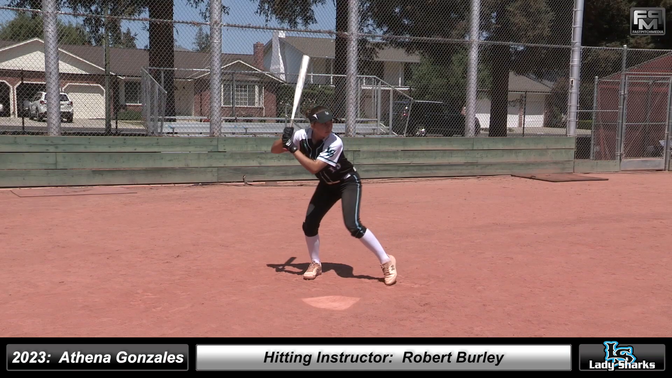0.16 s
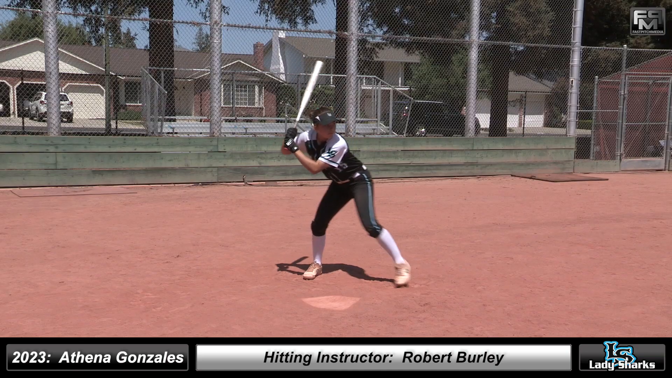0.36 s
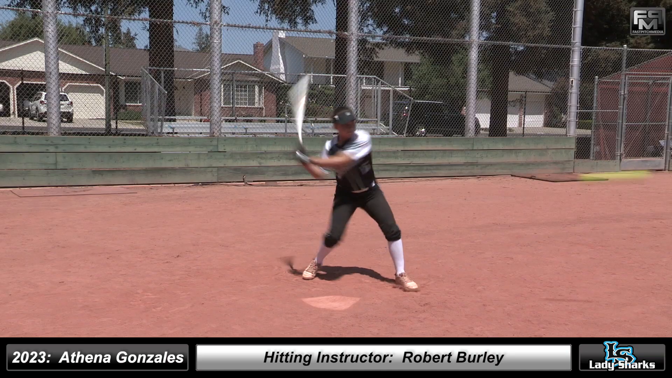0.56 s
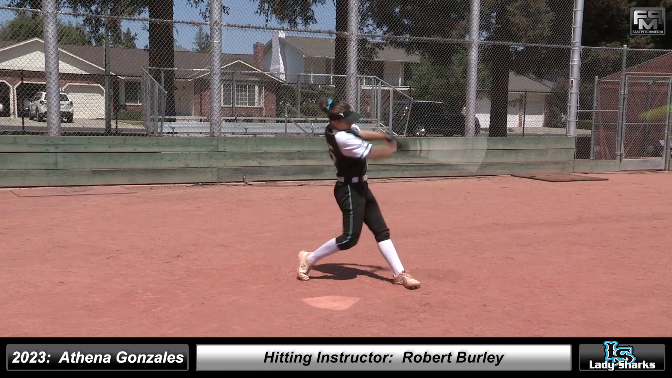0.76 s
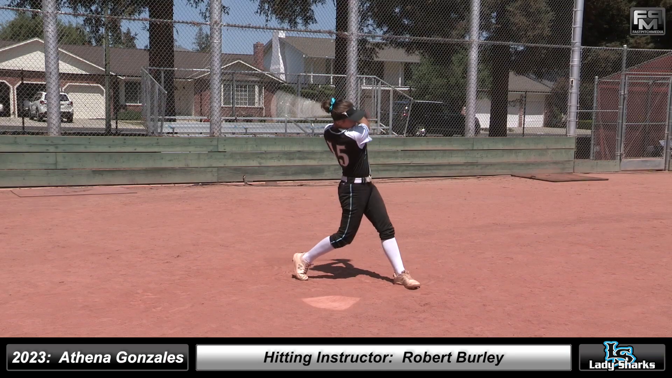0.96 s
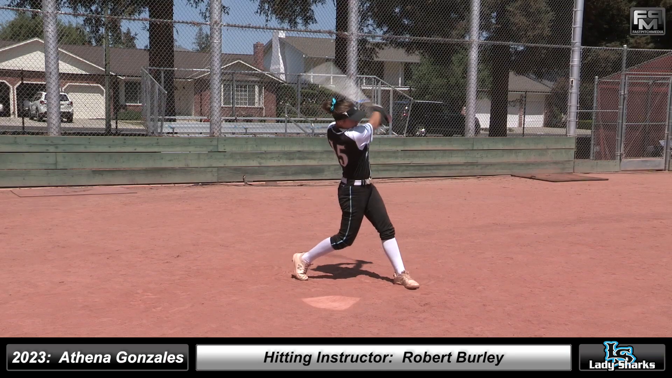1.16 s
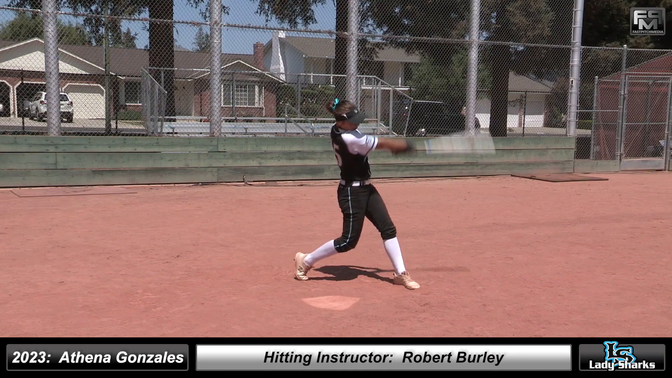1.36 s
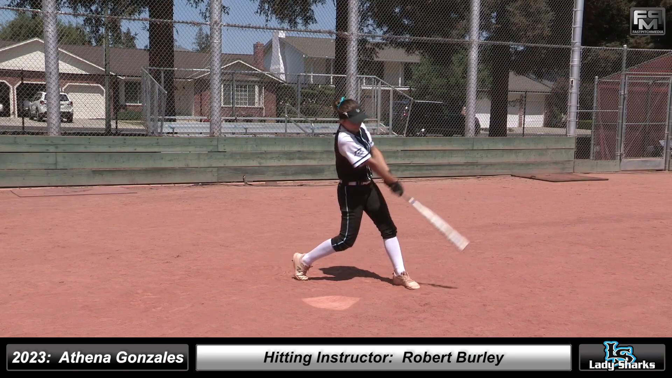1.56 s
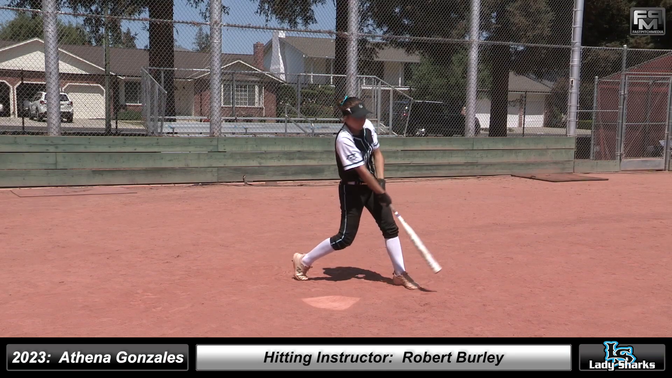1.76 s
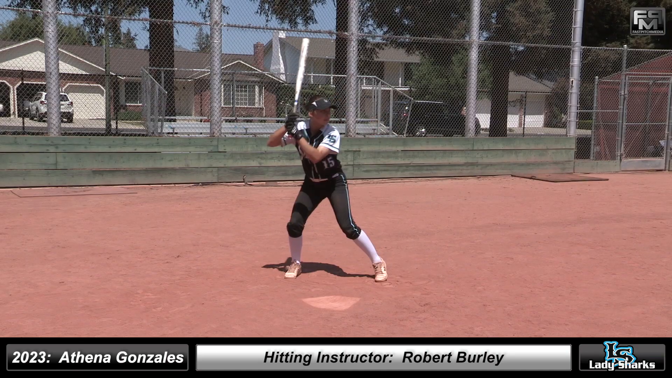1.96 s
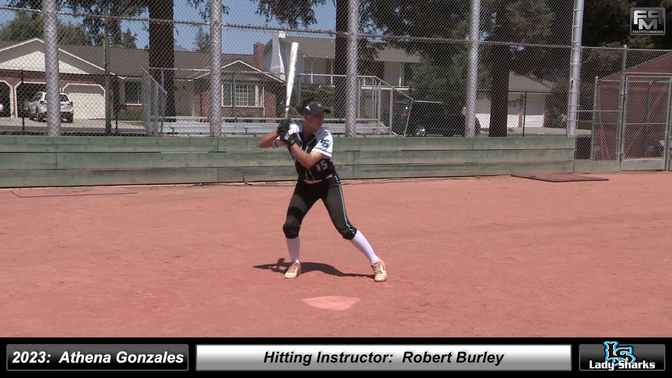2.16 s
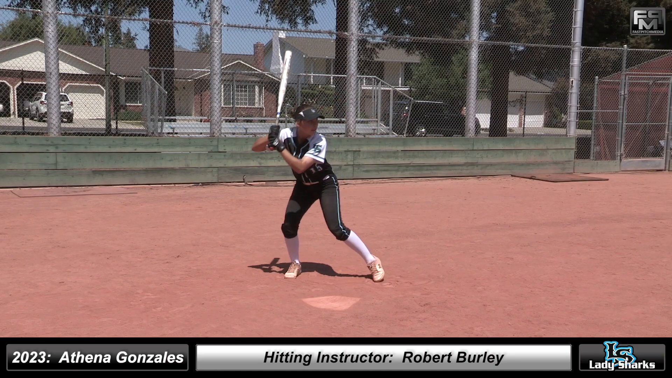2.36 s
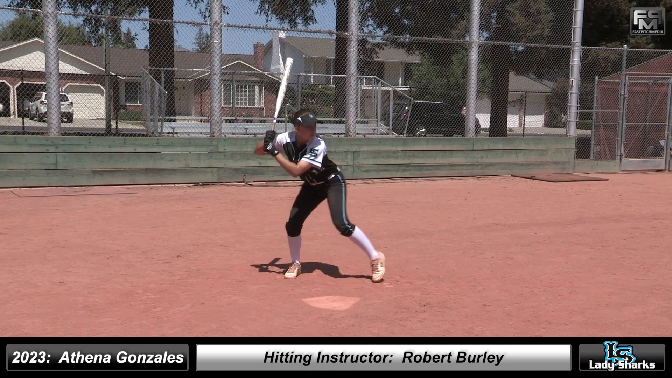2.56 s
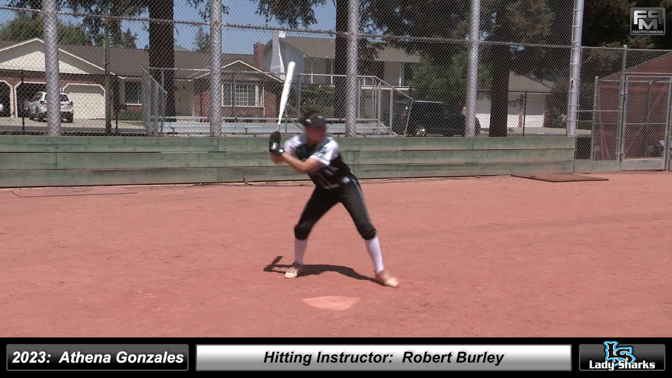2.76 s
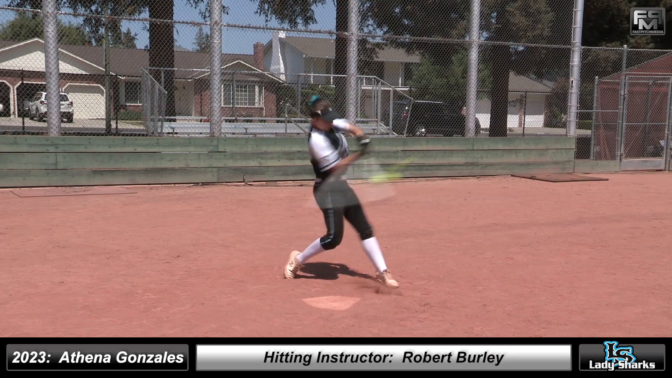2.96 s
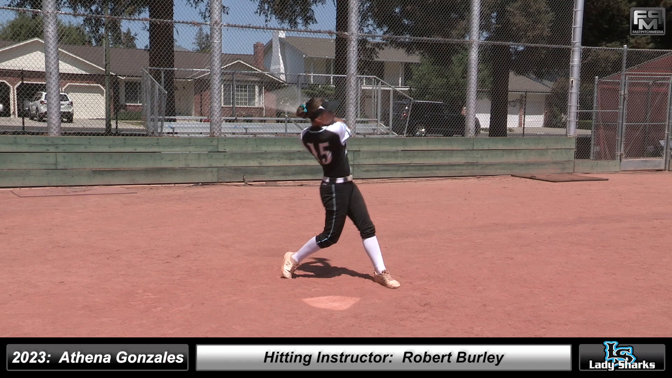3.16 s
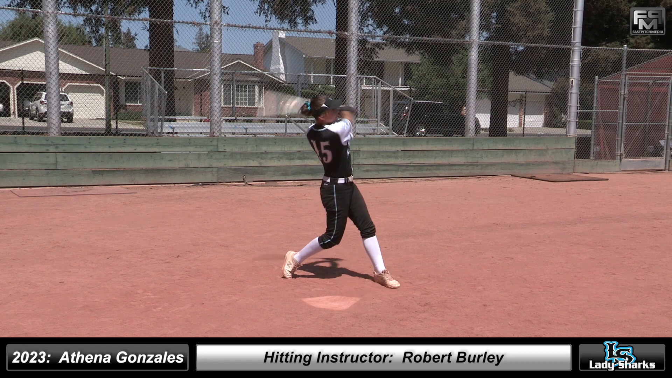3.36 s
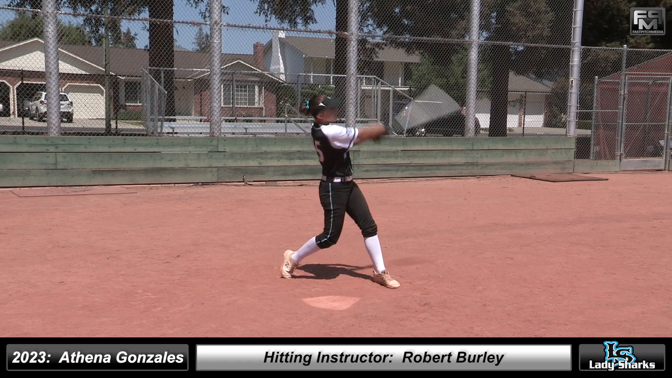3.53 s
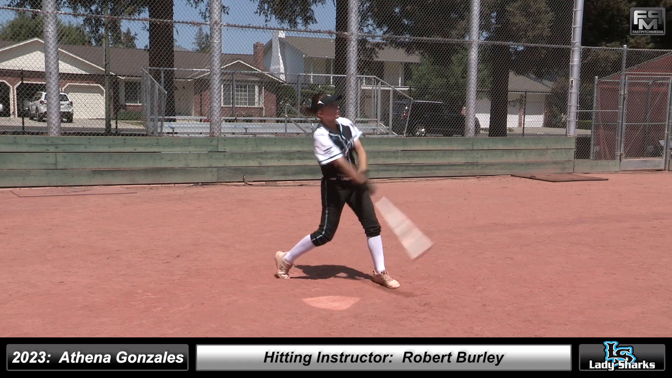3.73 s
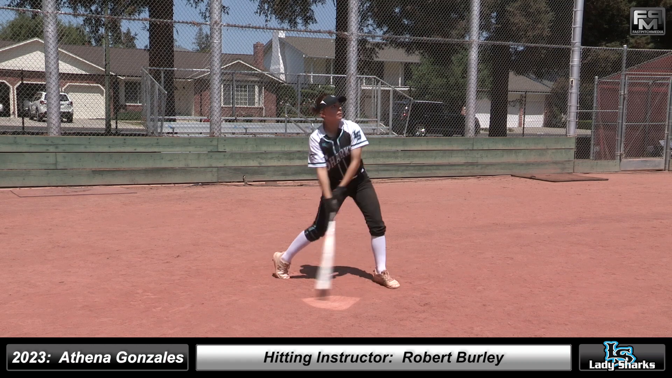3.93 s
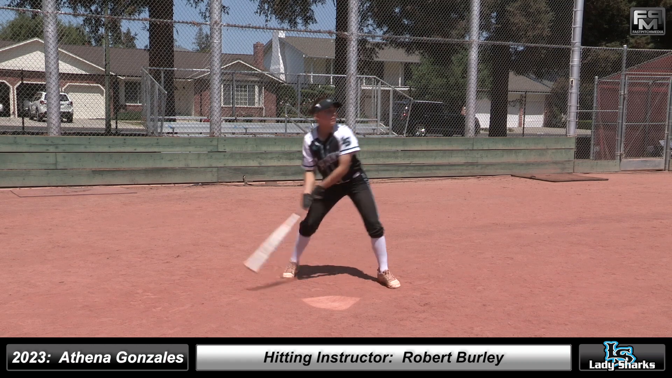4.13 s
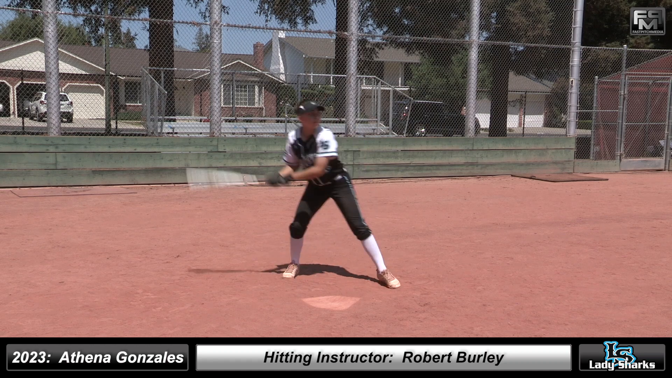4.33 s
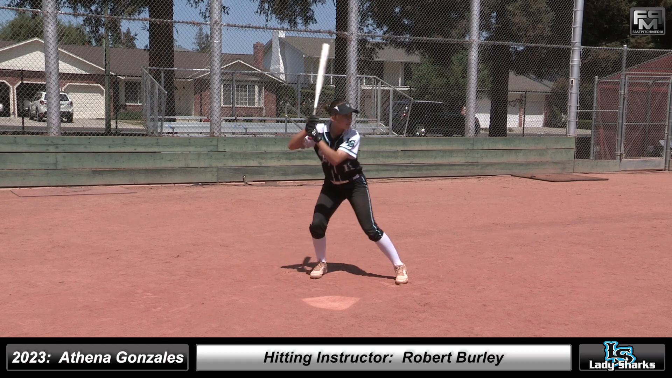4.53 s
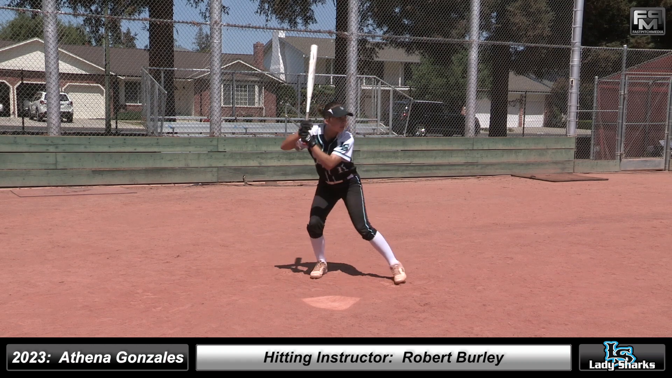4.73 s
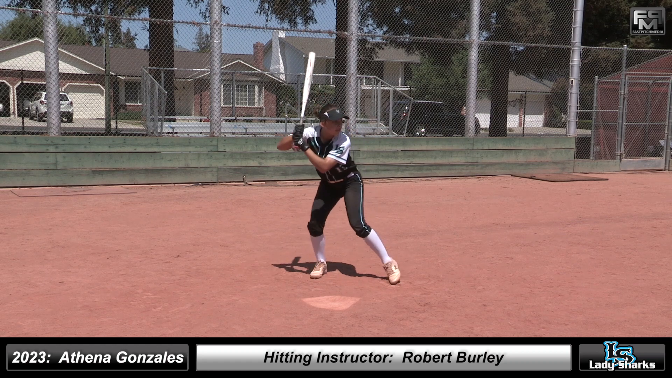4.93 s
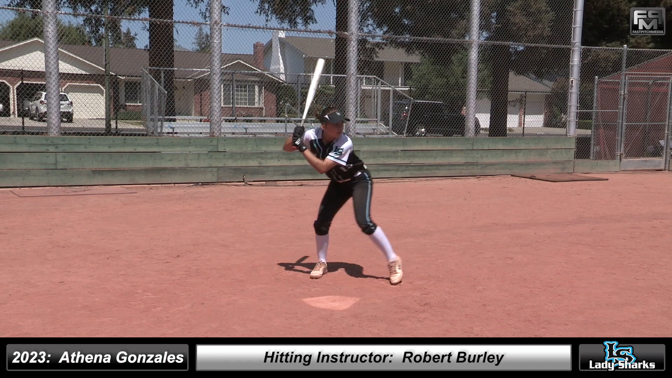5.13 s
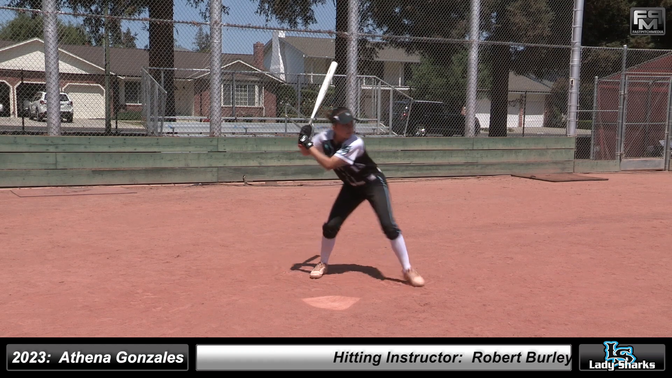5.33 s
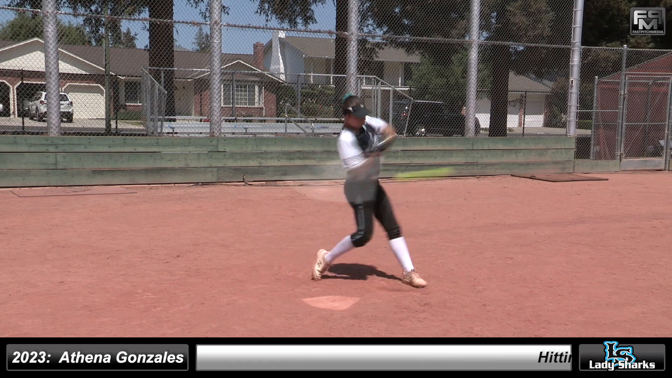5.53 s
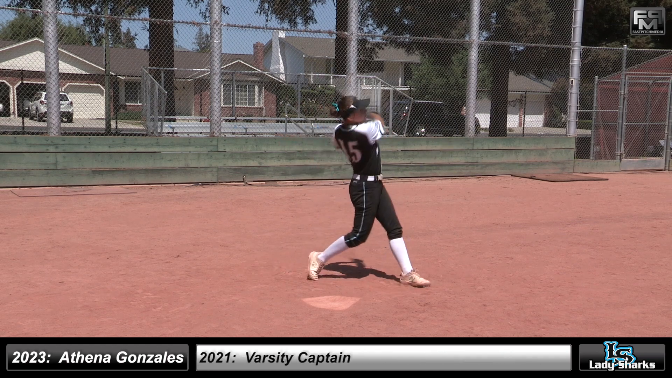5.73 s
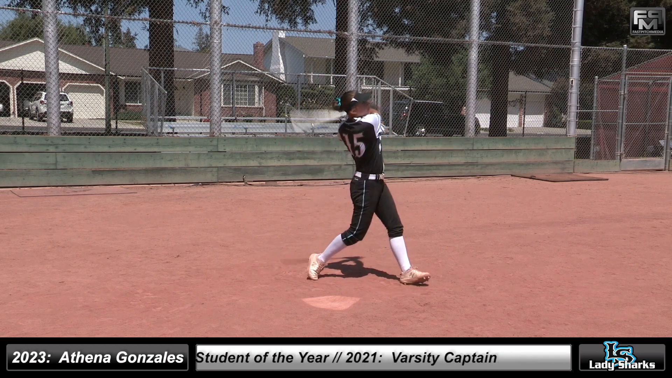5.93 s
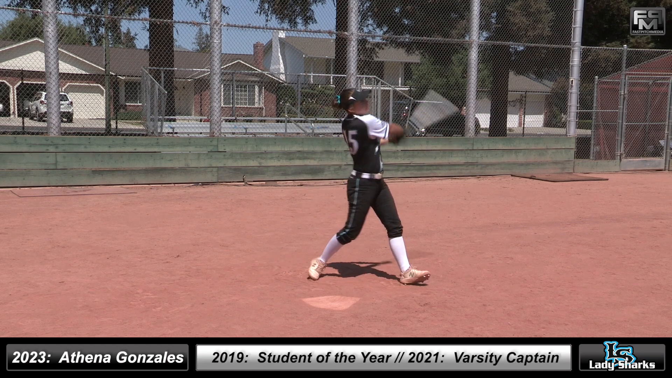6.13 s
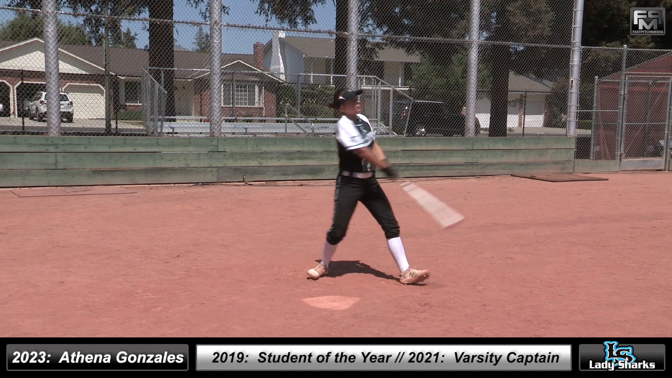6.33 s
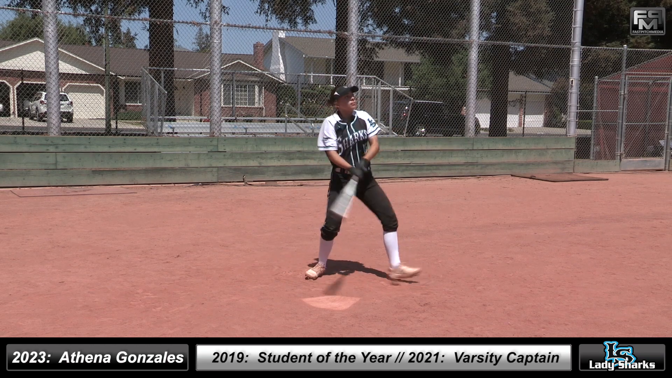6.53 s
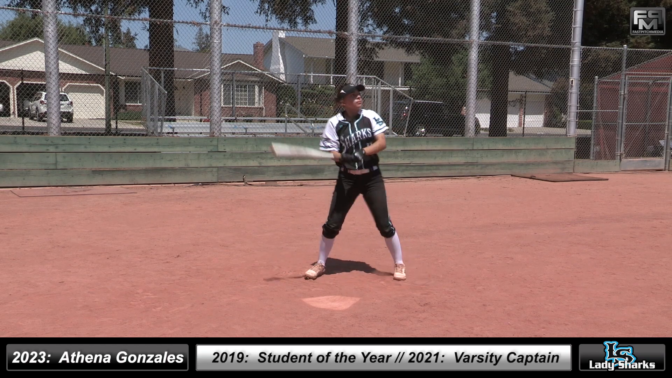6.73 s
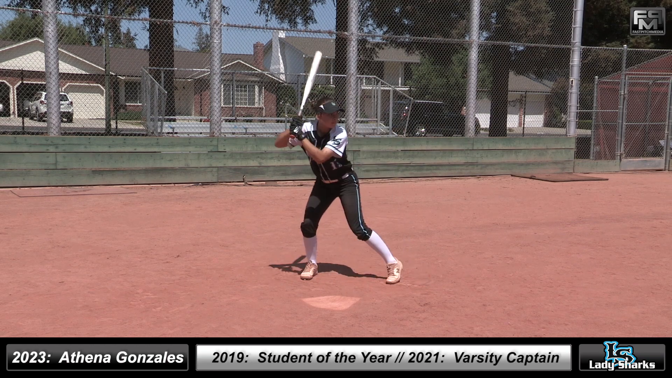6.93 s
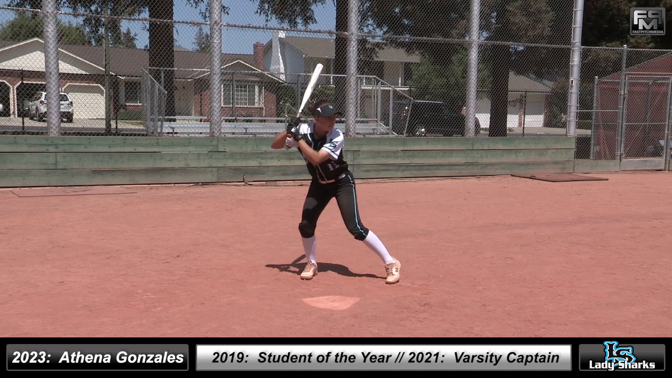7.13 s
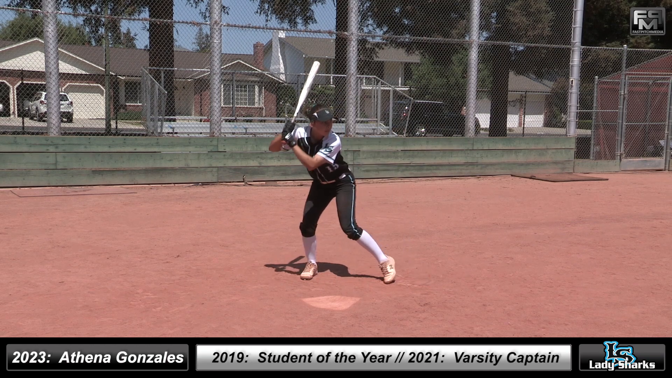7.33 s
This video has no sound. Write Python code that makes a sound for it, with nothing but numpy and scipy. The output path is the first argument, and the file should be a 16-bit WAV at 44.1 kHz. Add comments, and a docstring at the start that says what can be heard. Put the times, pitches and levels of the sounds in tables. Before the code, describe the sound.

Three clipped softball bat cracks ring briefly across an open dirt field, echoing off fences and houses, with cleats crunching between swings.

```python
"""Three hard bat hits crack out over a dirt softball field, each so loud that it overloads the microphone.
The barrel rings briefly; backstop, bleachers and far houses throw the crack back as filtered, delayed copies.
Around the swings cleats grind the dirt: random grains, scraping noise and sharp stud clicks.
Behind lie a low suburban rumble of shaped noise, a wavering engine tone, faint falling bird whistles
and thin, high pings of narrow noise."""
import sys
import numpy as np
from scipy import signal
from scipy.fft import rfft, irfft
from scipy.io import wavfile

SR = 44100
rng = np.random.default_rng(int(sys.argv[2]) if len(sys.argv) > 2 else 0)


def dump_mix(stems):
    """Bounce the given channels to the path in sys.argv[1] as a 16-bit WAV at rate SR."""
    frames = np.atleast_2d(stems).T  # one column per channel
    limited = np.clip(frames, -1, 1)  # hard clip at full scale
    pcm = np.round(limited * 32767).astype(np.int16)
    wavfile.write(sys.argv[1], SR, pcm)


N = 325899  # length of the scene in samples

# Bat meets ball: t/s, barrel ring level/dB, crack level/dB, ball thud level/dB, swish level/dB,
# barrel pitch factor, far echo level/dB
SWINGS = [(0.7424, 14, 6.5, -4.5, -34, 1, 0), (3.0259, 12, 4, 6.5, -50, 0.98, -2),
          (5.6131, 12, 4, 0.5, -30.5, 1.0, -1.5)]

TOUCH_S = 0.02  # the studs brush the dirt this long before a shoe comes down


def undb(db):
    """Turn decibels into a gain."""
    return 10 ** (np.asarray(db) / 20)


def unit(x):
    """Scale to an rms (average strength) of 1."""
    return x / np.sqrt(np.mean(x ** 2))


def add(out, s, x):
    """Mix x into out from time s (seconds) on."""
    i = max(int(round(s * SR)), 0)
    out[i:i + len(x)] += x[:max(len(out) - i, 0)]


def clock(length):
    """Give the sample times of a stretch, in seconds."""
    return np.arange(int(length * SR)) / SR


def fade(t, t60):
    """Die away smoothly, 60 dB down after t60 seconds."""
    return np.exp(-np.log(1000) * t / t60)


def spectrum_gain(points, count):
    """Read a gain for each frequency of count samples from a table of f/Hz, level/dB."""
    hz, db = np.transpose(points)
    f = np.maximum(np.fft.rfftfreq(count, 1 / SR), 1)
    return undb(np.interp(np.log(f), np.log(hz), db))


def colour(x, points):
    """Filter by a spectrum table, keeping the power of white noise."""
    return irfft(rfft(x) * unit(spectrum_gain(points, len(x))), len(x))


def lowpass(x, hz):
    """Take away treble gently above hz."""
    return signal.sosfilt(signal.butter(1, min(hz, SR * 0.45), fs=SR, output="sos"), x)


def band_noise(count, hz, width_hz):
    """Make noise with one resonance: strongest at hz, weaker on both sides, rms 1."""
    f = np.maximum(np.fft.rfftfreq(count, 1 / SR), 1)
    off_centre = (f / hz - hz / f) * hz / width_hz
    return unit(irfft(rfft(rng.standard_normal(count)) / (1 + off_centre ** 2), count))


def snap(points, size=1024):
    """Make the most compact click with this spectrum that starts at once (minimum phase), energy 1."""
    # Folding the cepstrum (spectrum of the log spectrum) forward packs the energy at the start.
    cepstrum = irfft(np.log(spectrum_gain(points, size)))
    cepstrum[1:size // 2] *= 2
    cepstrum[size // 2 + 1:] = 0
    click = irfft(np.exp(rfft(cepstrum)))
    return click / np.linalg.norm(click)


def burst(t, points, t60):
    """Make a dying spray of clicks with the given colour, rms 1 at its start."""
    spray = rng.standard_normal(len(t)) * fade(t, t60)
    return signal.fftconvolve(spray, snap(points))[:len(t)]


def wander(t, rate):
    """Join random values by straight lines, rate values a second."""
    knots = np.arange(0, t[-1] + 1 / rate, 1 / rate)
    return np.interp(t, knots, rng.standard_normal(len(knots)))


def patches(t, patchy_db=3.0, rate=170):
    """Make an uneven level, because outdoor scatter arrives in clumps from posts, walls and trees."""
    return unit(undb(patchy_db * wander(t, rate)))


def scatter(early_t60=0.28, build_s=0.065):
    """Diffuse echo of the field: a quick wash from the fences, a long one from trees and houses."""
    # Strength by pitch: f/Hz, early level/dB, late level/dB, late t60/s
    echo_bands = [(125, -26, -27, 1.6), (300, -10.5, -21, 1.3), (670, -18, -21.5, 1.42),
                  (1190, -5, -25.5, 2.2), (2270, -3, -25.5, 2.2), (4230, -6, -24.5, 2),
                  (8050, -13, -16, 0.61), (14000, -1, -24, 0.67)]
    hz, early_db, late_db, late_t60 = np.transpose(echo_bands)
    t = clock(3.1)
    log_f = np.log(np.maximum(np.fft.rfftfreq(len(t), 1 / SR), 1))
    noise = rfft(rng.standard_normal(len(t)))
    out = 0
    # Each share picks one band, which overlaps its neighbours.
    for k, share in enumerate(np.eye(len(hz))):
        band = irfft(noise * np.interp(log_f, np.log(hz), share), len(t))
        early = undb(early_db[k]) * fade(t, early_t60) / np.sqrt(early_t60)
        late = undb(late_db[k]) * fade(t, late_t60[k])
        out = out + band * (early + late)
    build_up = 1 - np.exp(-t / build_s)
    return out * patches(t) * build_up * np.sqrt(np.log(1000) / SR)


def town(waver_db=0.5, bass_low_hz=60, bass_high_hz=230, drone_waver_db=6.0, drone_drift=0.00716):
    """Distant traffic, its bass swelling and wavering, with one engine droning by, under a smooth hiss."""
    # Colour of the town's noise: f/Hz, level/dB per Hz
    town_colour = [(15, -48), (25, -30), (50, -12.5), (88, -4.5), (210, -6.5), (320, -10), (450, -15.5),
                   (850, -20), (1500, -24), (2000, -30.5), (4000, -37), (5600, -40.5), (8000, -44),
                   (15000, -47)]
    # Far traffic swelling: t/s, bass level/dB
    traffic_bass = [(0.0, -44.5), (0.95, -44.5), (2.36, -49.5), (3.0, -47.5), (3.38, -48), (4.16, -48.5),
                    (6.65, -51), (7.14, -46), (7.39, -47.5)]
    town_db = -47.5  # the whole noise, before its bass is replaced
    drone_hz, drone_db = 215, -50  # centre pitch and level, around which the engine wavers
    drone_peak_s, drone_swell_s = 5.0, 0.55
    t = np.arange(N) / SR
    air = undb(town_db) * unit(colour(rng.standard_normal(N), town_colour))
    bass_filter = signal.butter(2, [bass_low_hz, bass_high_hz], "band", fs=SR, output="sos")
    bass = signal.sosfiltfilt(bass_filter, air, padtype=None)
    bass_db = np.interp(t, *np.transpose(traffic_bass)) + waver_db * wander(t, 15)
    swell = np.exp(-((t - drone_peak_s) / drone_swell_s) ** 2)
    drone_gain = undb(drone_db + drone_waver_db * wander(t, 13)) * swell
    pitch = drone_hz * (1 + drone_drift * wander(t, 3))
    drone = drone_gain * np.sin(2 * np.pi * np.cumsum(pitch) / SR)
    return air - bass + undb(bass_db) * unit(bass) + drone


def birds():
    """A small bird's short whistles; every call falls in pitch the same way."""
    # Calls: t/s, level/dB
    calls = [(.39, -66), (4.49, -68), (4.595, -64), (4.7, -64)]
    call_s, start_hz, end_hz = 0.023, 5950, 5360
    out, count = np.zeros(N), len(clock(call_s))
    pitch = np.linspace(start_hz, end_hz, count)
    whistle = np.hanning(count) * np.sin(2 * np.pi * np.cumsum(pitch) / SR)
    for s, db in calls:
        add(out, s, undb(db) * whistle)
    return out


def pings(width_hz=130):
    """Faint, thin rings high in the treble, made of narrow bands of fading noise."""
    # Start of each ping: t/s, level/dB
    ping_starts = [(5.535, -57), (6.336, -70), (6.465, -60)]
    # What they ring with: f/Hz, level/dB, t60/s
    ping_tones = [(13220, 3, 0.19), (10040, -9, 0.96)]
    out, t = np.zeros(N), clock(0.8)
    for s, db in ping_starts:
        ping = sum(undb(mode_db) * band_noise(len(t), hz, width_hz) * fade(t, t60)
                   for hz, mode_db, t60 in ping_tones)
        add(out, s, undb(db) * ping)
    return out


def crunch(t, scrape_db, scrape_hz, grain_db=4.5, grain_share=0.068, scrape_width=0.41,
           least_width_hz=650):
    """Dirt breaks in tiny grains and the sole scrapes over it, slipping in jerks."""
    # Colour of the breaking dirt: f/Hz, level/dB
    grit_colour = [(300, 3), (800, -2), (1700, 1.5), (3000, 1), (4300, -6.5), (5600, -10), (7500, -26.5),
                   (15000, -39.5)]
    jerk_db, jerks_per_s = 2.6, 200
    chance = rng.random(len(t))
    size = np.minimum(rng.exponential(size=len(t)), 5)
    # grain_share of the samples hold a grain, pushing either way
    grains = (chance < grain_share) * undb(grain_db * size) * rng.choice([-1, 1], len(t))
    scrape = band_noise(len(t), scrape_hz, least_width_hz + scrape_width * scrape_hz)
    jerks = unit(undb(jerk_db * wander(t, jerks_per_s)))
    return (unit(colour(grains, grit_colour)) + undb(scrape_db) * scrape) * jerks


def stud(click_t60=0.0095, knock_hz=850, knock_t60=0.014):
    """One small stone snaps under a stud and knocks the sole; peak near 1."""
    # Colour of the snap: f/Hz, level/dB
    click_colour = [(250, -9), (850, 3), (1900, 10), (3200, 3.5), (5500, -3), (8000, -30), (15000, -34)]
    knock_db = -9.5  # the sole's knock, under the click's peak
    t = clock(0.03)
    click = burst(t, click_colour, click_t60)
    knock = undb(knock_db) * fade(t, knock_t60) * np.sin(2 * np.pi * knock_hz * t)
    return click / np.abs(click).max() + knock


def footfall(click_db, crunch_db, scrape_db, load_s, settle_s, settle_db=-27):
    """The studs brush the dirt, one bites; the crunch rises with the weight and dies as the shoe settles."""
    touch_db = -10  # the first brush, under the crunch
    scrape_hz = 696  # resonance of a sole coming down
    t = clock(0.53) - TOUCH_S  # zero is when the shoe comes down
    touch = undb(touch_db) * np.minimum(1 + t / TOUCH_S, 1)
    load = np.maximum(touch, np.minimum(t / load_s, 1))
    settle = undb(settle_db * np.maximum(t - load_s, 0) / settle_s)  # falls by settle_db every settle_s
    out = undb(crunch_db) * crunch(t + TOUCH_S, scrape_db, scrape_hz) * load * settle
    add(out, TOUCH_S, undb(click_db) * stud())
    return out


def twist(half_s, scrape_db, scrape_hz, stone_spread_db=4):
    """The crunch swells and fades as the shoe turns; loose stones snap at random moments."""
    stones_per_s = 32  # rounded down to whole stones in each twist
    stone_db = 11.5  # over the crunch, before each stone's random drop of 2 to 10 dB
    t = clock(2 * half_s)
    out = crunch(t, scrape_db, scrape_hz) * np.hanning(len(t))
    for place, size in rng.random((int(t[-1] * stones_per_s), 2)):
        snap_db = stone_db + stone_spread_db * (2 * size - 2.5)
        add(out, place * t[-1], undb(snap_db) * stud())
    return out


def feet(field_db=-7):
    """The batter strides into each swing, and also steps and twists on the dirt; the field echoes it."""
    # Front foot plants, its heel drops, back foot pivots: time before contact/s
    move_leads = (.198, .158, .102)
    # Sound of those three moves: settling time/s, stud click level over the crunch/dB, sole scrape level/dB
    move_sounds = [(0.069, 12.5, -1), (.09, 5.5, -17), (.2, 6, -6)]
    # One row per swing: plant level/dB, heel drop level/dB, pivot level/dB, extra stud bite/dB, loading time/s
    swing_strides = [(-36, -43.5, -38.5, 5, 0.0064), (-33, -32.5, -37.5, 6, 0.0043),
                     (-36.5, -52, -44, -5, 0.0062)]
    # Further single footfalls, one of them a heel drop just before the third swing:
    # t/s, stud click level/dB, crunch level/dB, settling time/s
    further_footfalls = [(.3204, -32, -57, .05), (1.3748, -26, -40, 0.059), (1.4425, -19.5, -42, 0.073),
                         (2.411, -31.5, -52, .03), (4.013, -29.5, -45.5, 0.13), (4.0502, -28, -46, 0.055),
                         (4.1863, -31, -43, 0.16), (4.8124, -36, -56, 0.034), (4.8288, -33, -58, 0.046),
                         (5.1457, -37, -52, .08), (5.4688, -28.5, -55, 0.055), (6.2528, -38, -50, .06),
                         (6.3961, -27, -42, 0.042), (6.4383, -29.5, -46.5, 0.16),
                         (6.708, -26.5, -44.5, .18), (6.8649, -24, -47.5, 0.049)]
    # A shoe twisting in place: middle t/s, half length/s, level/dB, sole scrape level/dB, scrape f/Hz
    shoe_twists = [(.152, 0.082, -52, -15, 2500), (0.351, 0.023, -42, -19, 2500),
                   (0.532, 0.042, -39.5, 1.5, 480), (2.03, 0.053, -56.5, 3, 1830),
                   (2.206, 0.042, -49, -11, 7450), (2.53, 0.21, -50.5, -1, 1560),
                   (4.012, .07, -47.5, -18, 2000), (4.259, .02, -50, 5.5, 1500), (4.391, .09, -53, 5, 1200),
                   (4.887, .06, -50, 2.5, 1000), (5.248, 0.15, -59, -12, 3900),
                   (5.533, 0.017, -44.5, -3.5, 4450), (6.429, .1, -51.5, -7.5, 3200),
                   (7.291, 0.054, -57, -2, 1504)]
    further_load_s, further_scrape_db = 0.004, -7.5  # a further footfall's rise; its scrape under the crunch
    out = np.zeros(N)
    for (contact_s, *_), (*move_db, bite_db, load_s) in zip(SWINGS, swing_strides):
        for lead_s, db, (settle_s, click_db, scrape_db) in zip(move_leads, move_db, move_sounds):
            move = footfall(db + click_db + bite_db, db, scrape_db, load_s, settle_s)
            add(out, contact_s - lead_s - TOUCH_S, move)
    for s, click_db, crunch_db, settle_s in further_footfalls:
        fall = footfall(click_db, crunch_db, further_scrape_db, further_load_s, settle_s)
        add(out, s - TOUCH_S, fall)
    for s, half_s, db, scrape_db, scrape_hz in shoe_twists:
        add(out, s - half_s, undb(db) * twist(half_s, scrape_db, scrape_hz))
    return out + undb(field_db) * signal.fftconvolve(out, scatter())[:N]


def barrel(t, pitch, damping):
    """One blow makes the bat ring at several pitches at once; more damping shortens the ring."""
    # The bat's ring, before pitch and damping factors: f/Hz, level/dB, t60/s
    bat_tones = [(1207.6, -4.5, 0.042), (1257, -18, 0.036), (1738, -9, 0.028), (2402, -16.5, 0.04),
                 (2717, -13.5, 0.029), (3140, -18, 0.036), (3505, -12.5, 0.016), (3630, -20.5, 0.032),
                 (4900, -8.5, 0.011)]
    return sum(undb(db) * fade(t * damping, t60) * np.sin(2 * np.pi * hz * pitch * t)
               for hz, db, t60 in bat_tones)


def taps(tick_t60=0.023, damping=2.1):
    """The bat taps the batter's back as the swing ends: a light, bright knock, damped by the body."""
    # Taps: t/s, tick level/dB, ring level/dB
    back_taps = [(1.065, -28, -45), (3.309, -29.5, -35), (5.907, -30.5, -22.5)]
    # Colour of the tick: f/Hz, level/dB
    tick_colour = [(600, -17), (1350, -10), (2200, -1), (3500, 0), (4900, 5), (6500, -8), (9000, -5),
                   (15000, -17)]
    out, t = np.zeros(N), clock(0.06)
    for s, tick_db, ring_db in back_taps:
        tick = undb(tick_db) * burst(t, tick_colour, tick_t60)
        add(out, s, tick + undb(ring_db) * barrel(t, 1.0, damping))
    return out


def hits(wash_db=22, ring_wash_db=-4, far_ring_db=-31.0, far_crack_db=-8, row_t60=0.97, row_low_hz=1100,
         air_hz=8000, ring_edge_hz=3500, thud_hz=680, thud_t60=0.013, swish_s=0.016):
    """The barrel swishes in; contact cracks, the ball thuds, the bat rings; the field answers."""
    # Colour of the contact crack: f/Hz, level/dB
    crack_colour = [(60, -14), (200, -25), (450, -34.5), (750, -4.5), (1050, -4), (1700, -1.5),
                    (3000, -8.5), (5200, -14), (8000, -16.5), (15000, -34)]
    # Near paths, direct and by backstop and bleachers: delay/s, level/dB, crack t60/s, treble edge f/Hz,
    # ball thud level/dB
    near_paths = [(0, -1, 0.037, 14000, 9.5), (.018, -16, 0.03, 5000, -27),
                  (0.0361, -25.5, 0.033, 9000, 14), (0.0449, -10, 0.043, 3040, -19),
                  (0.055, -19.5, 0.065, 4000, 3), (.076, -30, .035, 3500, -14),
                  (0.106, -33, 0.064, 2800, -27), (.204, -42.5, 0.047, 12000, -19)]
    # Echoes from the houses across the road, same columns; they come back without bass
    house_paths = [(0.3248, -27.5, 0.029, 5500, -30), (0.338, -46, 0.013, 2200, -30),
                   (.349, -33.5, .02, 2200, -30), (0.377, -40, 0.049, 12000, -30)]
    far_doppler = 1.03  # the moving barrel sends a slightly higher ring toward the far houses
    near, far = np.zeros(N), np.zeros(N)
    t, row = clock(0.15), clock(1)
    for s, ring_db, crack_db, thud_db, swish_db, pitch, far_db in SWINGS:
        ring = undb(ring_db) * barrel(t, pitch, 0.86)
        far_ring = undb(ring_db) * barrel(t, pitch * far_doppler, 0.86)
        thud = undb(thud_db) * fade(t, thud_t60) * np.sin(2 * np.pi * thud_hz * t)
        swish = band_noise(len(t), 730, 1160) * np.exp(-t[::-1] / swish_s)  # grows until contact
        add(near, s - len(t) / SR, undb(swish_db) * swish)
        routes = ((near, near_paths, 1, ring), (far, house_paths, undb(far_db), far_ring))
        for out, paths, gain, tone in routes:
            for delay, db, crack_t60, edge_hz, ball_db in paths:
                # Each uneven surface sprays the crack its own way and returns its own blend of ball and barrel.
                crack = undb(crack_db) * burst(t, crack_colour, crack_t60)
                blend = lowpass(crack + tone + undb(ball_db) * thud, edge_hz)
                add(out, s + delay, gain * undb(db) * blend)
        # The sharp contact spreads into a smooth wash, the ring into a lingering tone.
        crack_wash = signal.fftconvolve(snap(crack_colour), scatter())
        ring_wash = signal.fftconvolve(lowpass(ring + thud, ring_edge_hz), scatter())
        add(near, s, undb(wash_db + crack_db) * crack_wash)
        add(near, s, undb(ring_wash_db) * ring_wash)
        # The row of houses renews both when its first echo comes back.
        fronts = rng.standard_normal(len(row)) * fade(row, row_t60) * patches(row)
        fronts *= undb(far_db) / np.linalg.norm(fronts)
        far_ring_wash = signal.fftconvolve(lowpass(far_ring, ring_edge_hz), fronts)
        far_crack_wash = signal.fftconvolve(snap(crack_colour), fronts)
        first_echo_s = s + house_paths[0][0]
        add(far, first_echo_s, undb(far_ring_db) * far_ring_wash)
        add(far, first_echo_s, undb(far_crack_db) * far_crack_wash)
    far = signal.sosfilt(signal.butter(4, row_low_hz, "high", fs=SR, output="sos"), far)
    return near + lowpass(far, air_hz)  # the long way through the air dulls it


def scene():
    """Mix everything that reaches the microphone, as one channel."""
    background = town() + birds() + pings()
    batter = feet() + taps() + hits()
    return (background + batter)[None]


def record(dry, ceiling=0.2, lopsided=0.058, coupling_hz=12):
    """The input stage flattens the cracks, a little unevenly; its coupling drains the offset; the top is cut."""
    top_hz = 16000
    drive = dry / ceiling
    flat = drive / (1 + drive ** 6) ** (1 / 6)  # quiet sound passes, loud sound levels off at 1
    flat = ceiling * (flat + lopsided * flat ** 2)
    flat = signal.sosfilt(signal.butter(2, coupling_hz, "high", fs=SR, output="sos"), flat)
    return signal.sosfilt(signal.ellip(8, 0.2, 70, top_hz, fs=SR, output="sos"), flat)


dry = scene()
out = record(dry)
dump_mix(out)
```